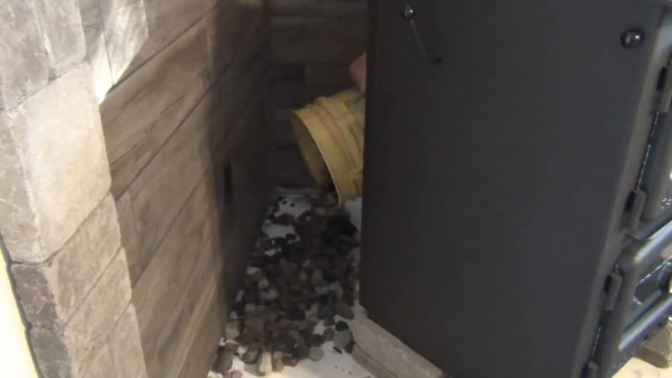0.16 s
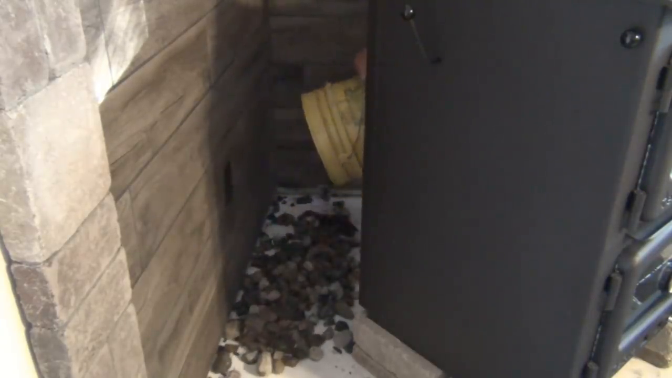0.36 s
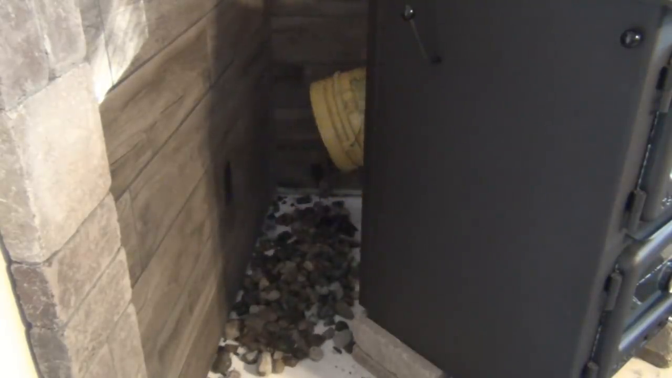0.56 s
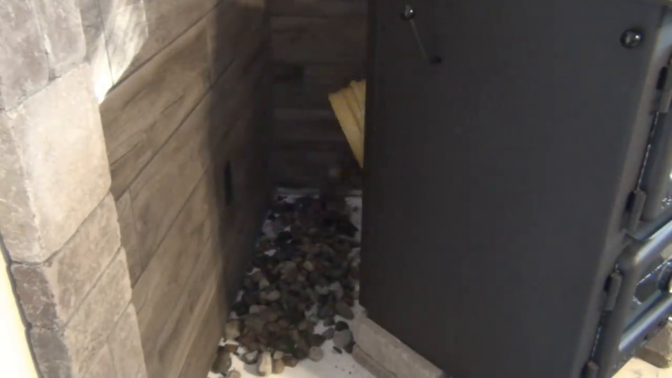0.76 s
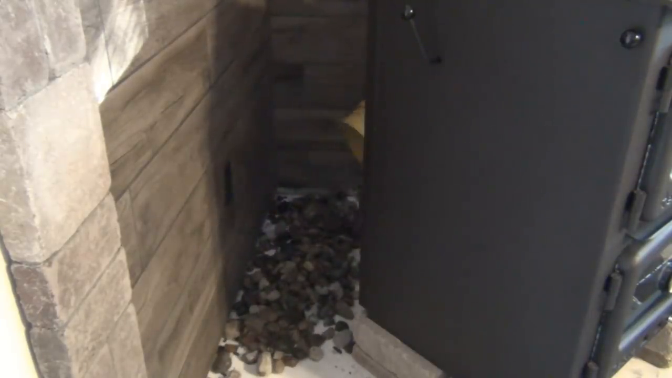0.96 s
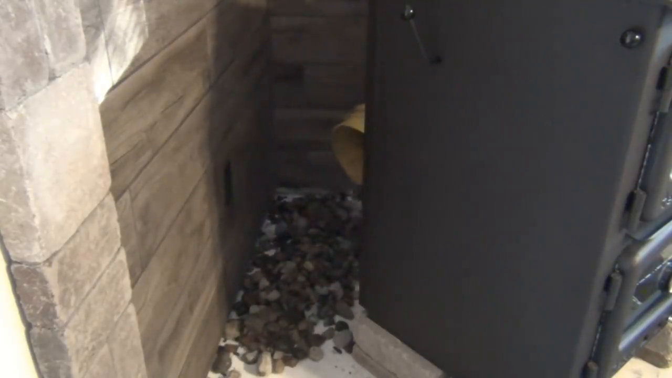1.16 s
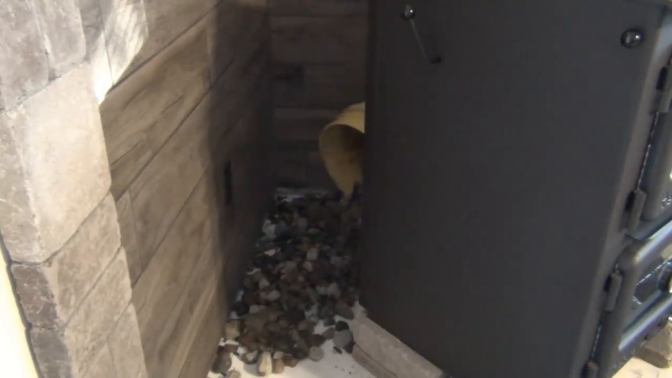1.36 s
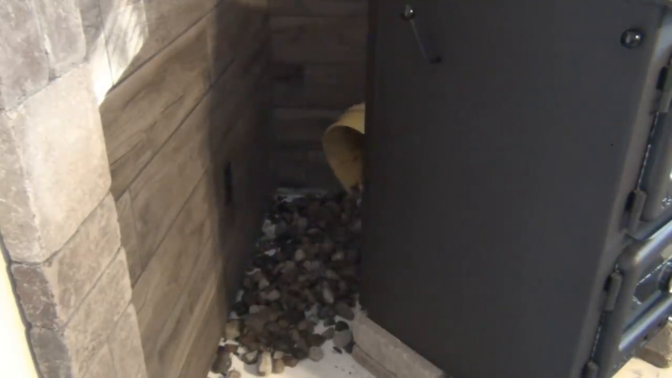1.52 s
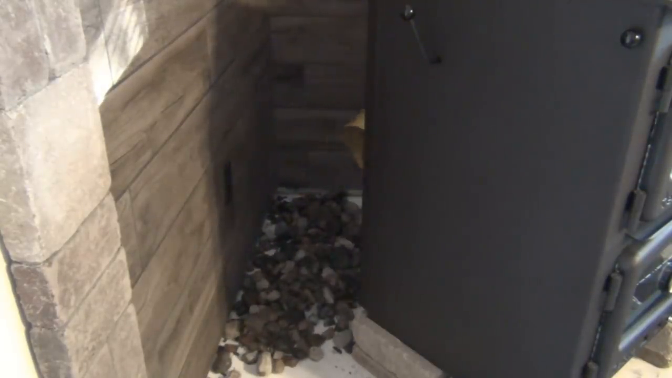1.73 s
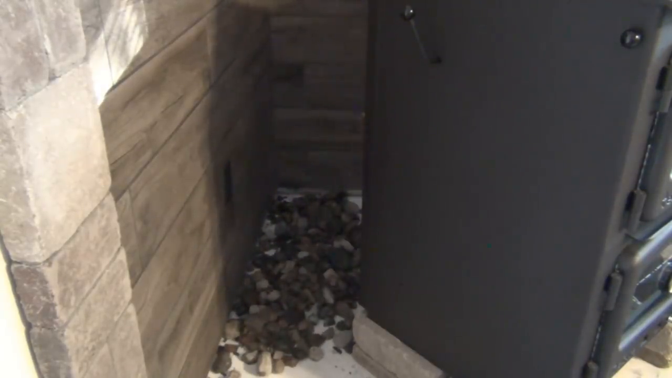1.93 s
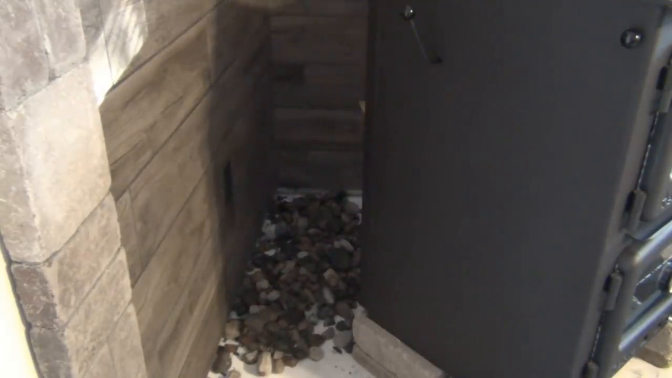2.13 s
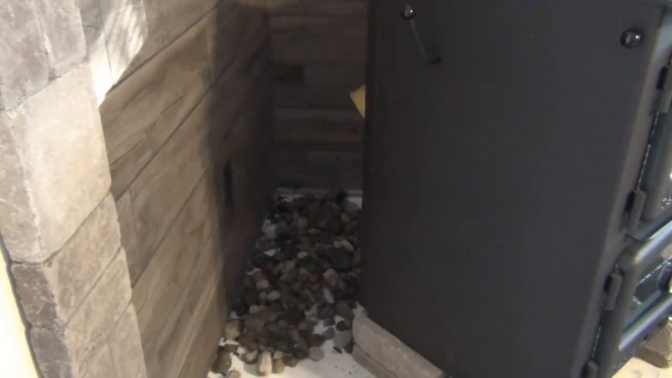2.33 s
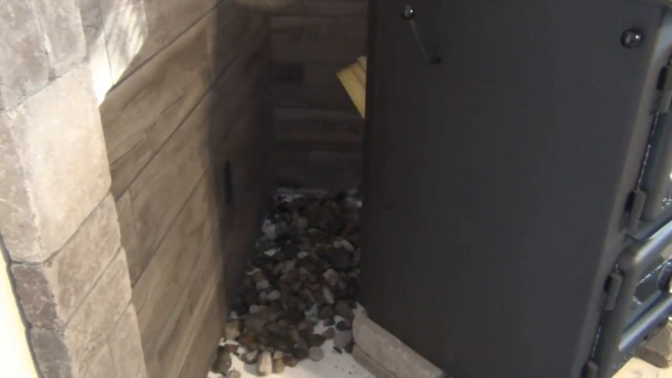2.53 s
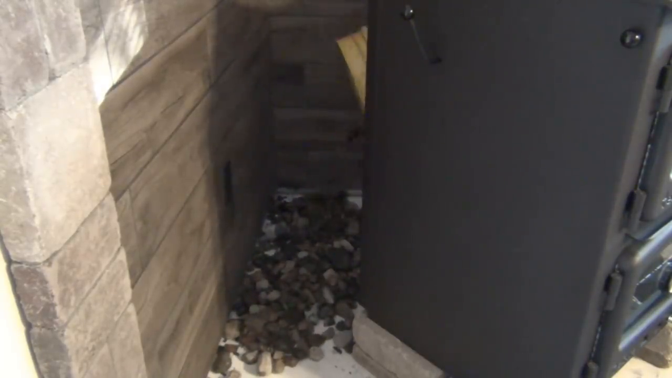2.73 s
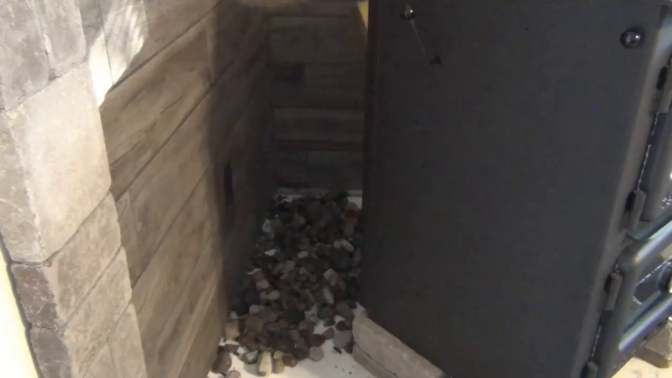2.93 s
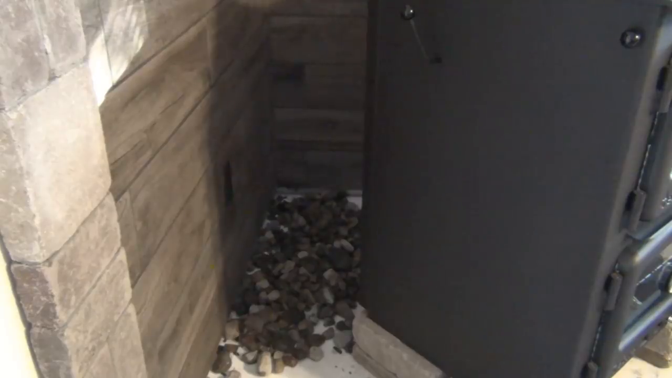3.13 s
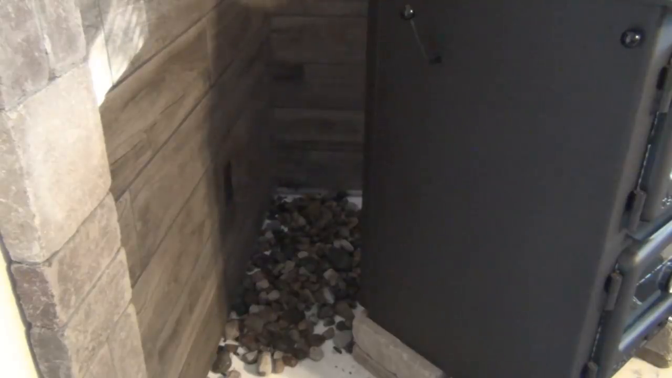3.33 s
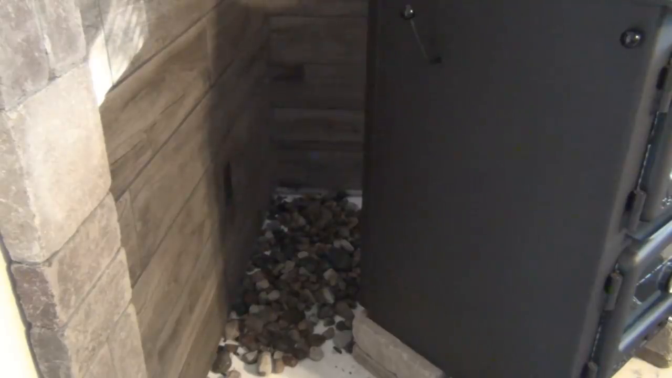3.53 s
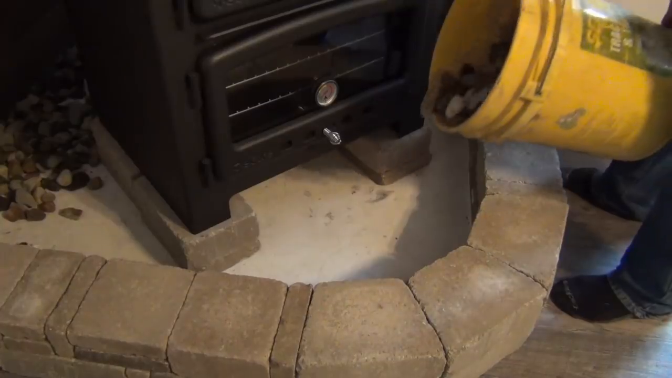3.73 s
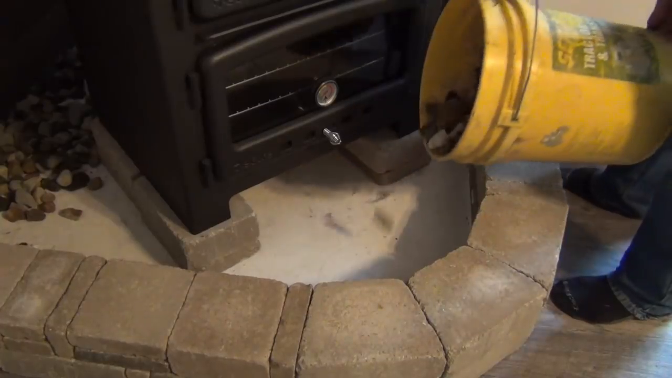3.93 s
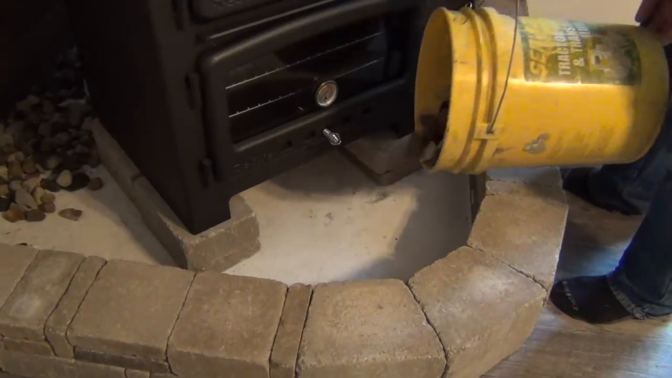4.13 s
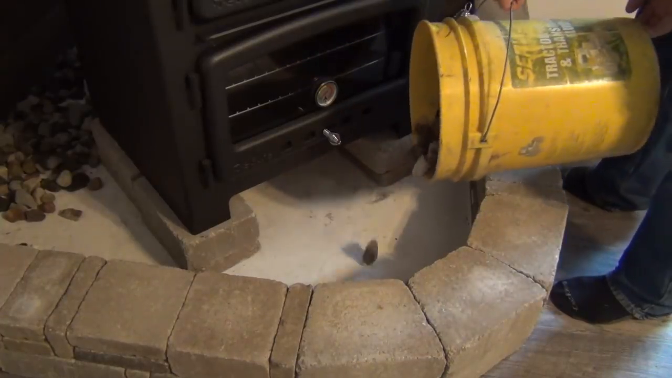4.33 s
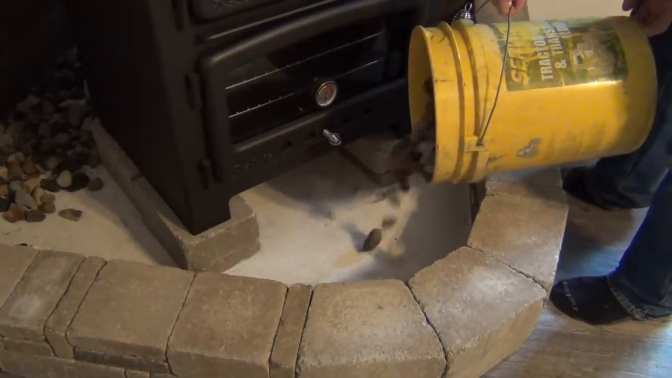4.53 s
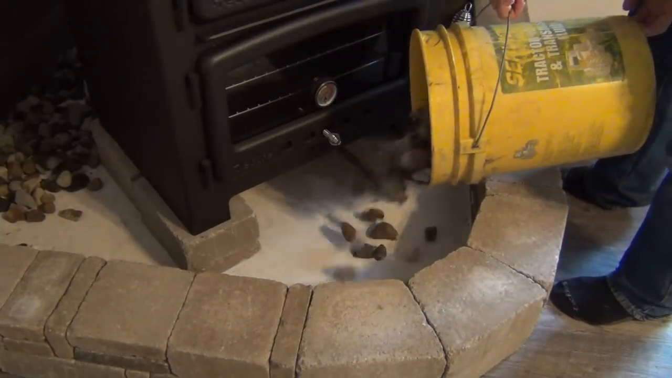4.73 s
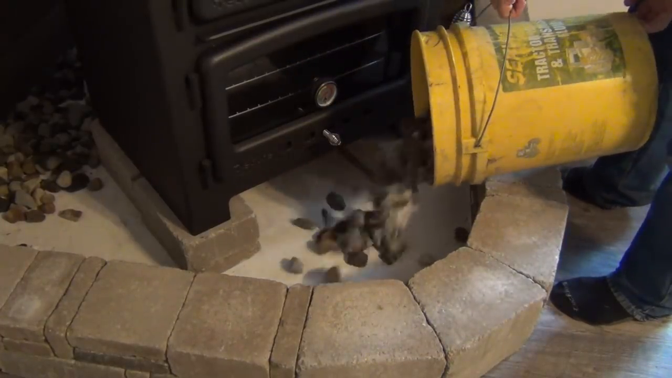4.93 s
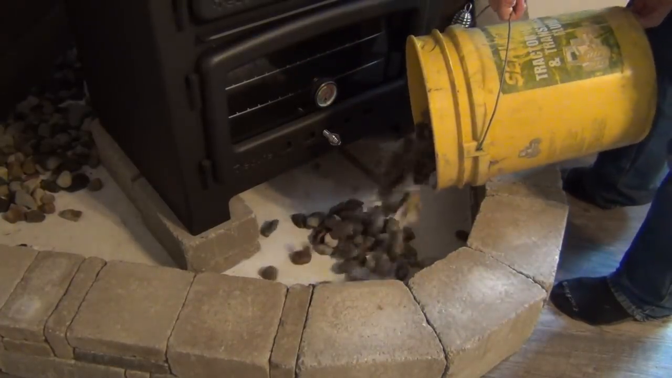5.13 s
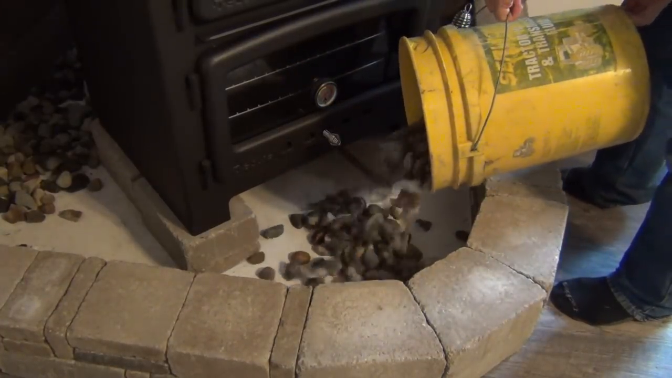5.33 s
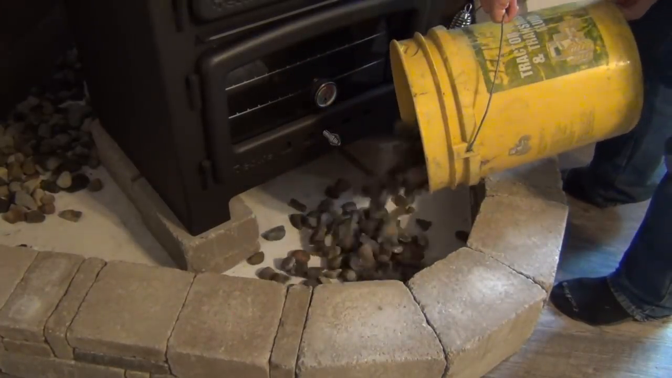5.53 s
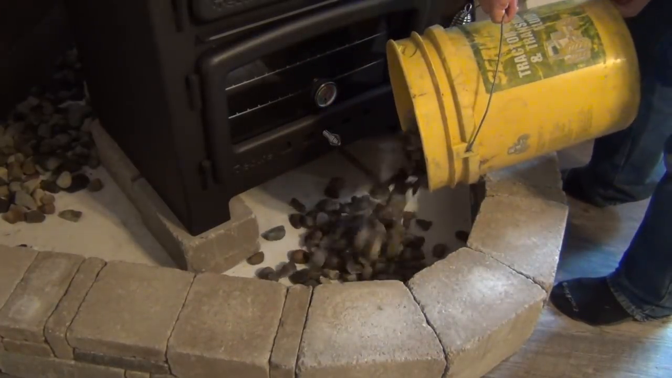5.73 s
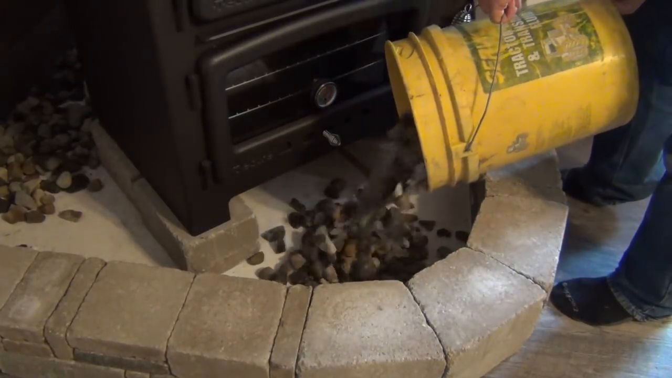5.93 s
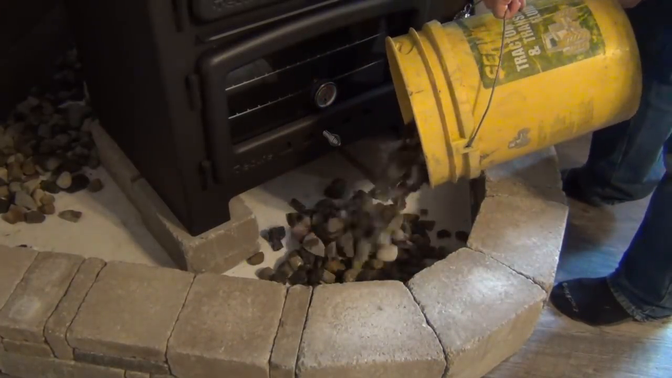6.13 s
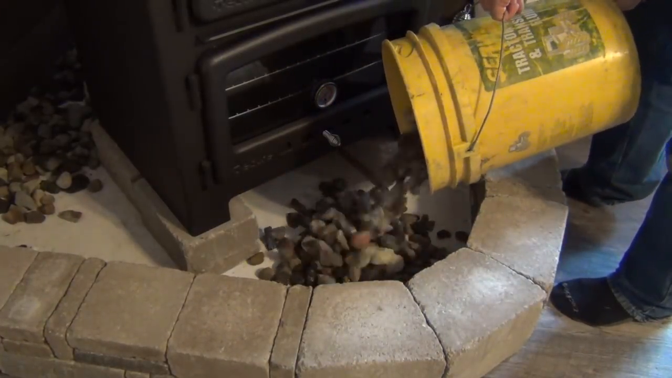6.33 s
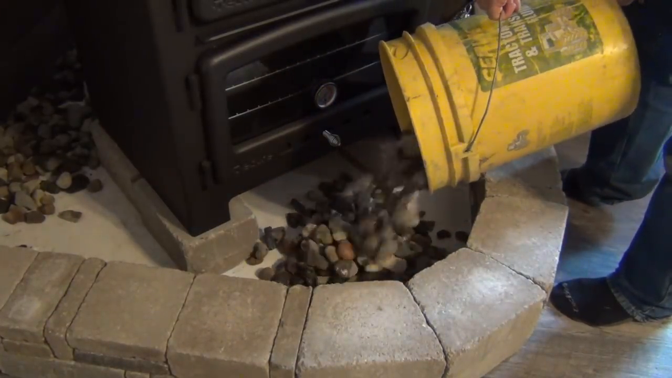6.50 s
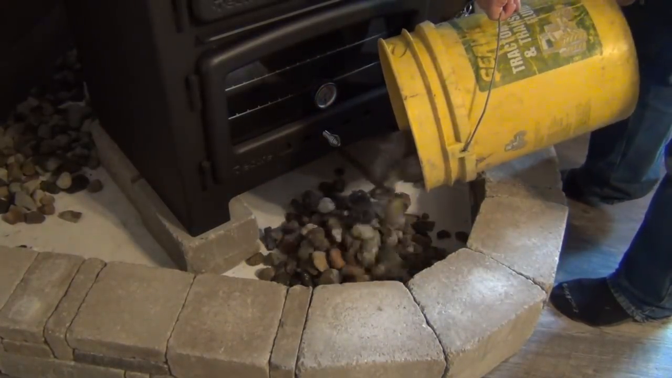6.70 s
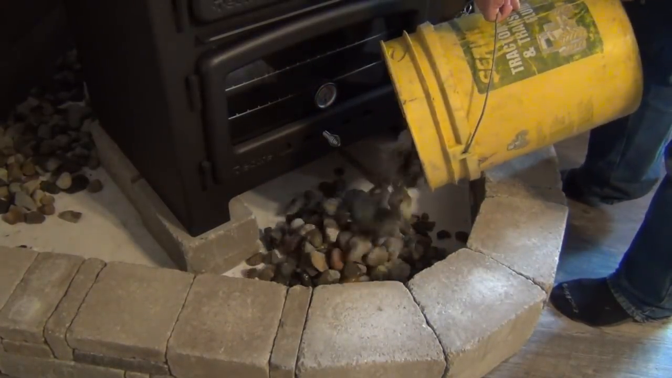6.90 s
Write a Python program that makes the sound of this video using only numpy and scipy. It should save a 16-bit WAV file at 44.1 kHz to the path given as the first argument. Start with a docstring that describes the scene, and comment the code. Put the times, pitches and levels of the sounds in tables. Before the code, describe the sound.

Pebbles tumble from a plastic bucket into a stone nook, knocking its hollow wall and clicking densely on the heap. The pour thins to a few bright ticks and a brief quiet with faint house hum. After an abrupt cut, scattered stones knock and land duller on bare hearth, then a thick rush follows until the end. Close, nearly mono microphone in a small hard room, loud peaks squashed.

```python
"""River pebbles pour from a plastic bucket into a stone nook, over a faint house hum that never stops.
Stones knock on the bucket wall and ring its hollow body; those that land click on the heap.
A hard-walled room echoes, some stones stand out with their own ring, and low thumps mark limiter pumping.
After a cut at 3.58 s a second pour goes onto a hearth, where stones landing on bare ground click duller.
All along, a limiter turns down the loud moments and rounds off the peaks."""
import sys
import numpy as np
from scipy import signal
from scipy.fft import rfft, irfft
from scipy.io import wavfile
from scipy.ndimage import uniform_filter1d

SR = 44100
rng = np.random.default_rng(int(sys.argv[2]) if len(sys.argv) > 2 else 0)


def unload_audio(sound):
    """Save the sound as a 16-bit wav file, at the path given as the first command line argument."""
    columns = np.transpose(np.atleast_2d(sound))
    # keep every value between -1 and 1, then stretch to whole-number steps
    steps = np.round(np.clip(columns, -1, 1) * 32767)
    wavfile.write(sys.argv[1], SR, steps.astype(np.int16))


N = 306936

# the two pours, one list each: (time [s], knocking in the bucket [relative dB], clicking on the heap [relative dB])
POURS = [
    [(0, -22.5, -18.5), (0.12, -27, -21), (0.47, -23, -25), (0.8, -23, -20), (1.28, -28.5, -20),
     (1.6, -25, -20.5), (1.95, -26.5, -20), (2.25, -29.5, -23), (2.6, -30.5, -23), (2.77, -40, -22),
     (2.785, -62, -22), (3.0, -54, -25), (3.19, -52, -50), (3.57, -59.5, -52.5)],
    [(3.58, -32, -48), (3.99, -33, -54), (4.23, -32.5, -37), (4.34, -26, -29.5), (4.42, -15, -24),
     (4.8, -20.5, -20), (5.04, -31, -19), (5.3, -27.5, -19), (5.55, -24.5, -20.5), (6.0, -24.5, -19.5),
     (6.25, -32, -21.5), (6.45, -19.5, -19.5), (6.78, -25, -21.5), (6.96, -20.5, -21.5)],
]
# batches of stones that slip at once:
# (start [s], length before the fade [s], knocking [relative dB], clicking [relative dB])
SLIPS = [(0.02, 0.026, -43, -35), (0.162, 0.024, -26.5, -38), (0.519, 0.021, -23, -32),
         (0.59, 0.025, -24, -39), (0.68, 0.039, -38, -28), (0.827, 0.034, -19.5, -35),
         (1.102, 0.16, -27, -36), (1.879, 0.017, -33, -29), (2.06, 0.067, -32, -33),
         (2.33, 0.12, -38.5, -33), (2.446, 0.021, -25.5, -31), (2.929, 0.008, -41.5, -32),
         (3, 0.021, -29.5, -36.5), (3.581, 0.13, -14, -22.5), (3.785, .04, -25, -30.5),
         (3.945, .025, -25, -46), (3.998, .02, -33, -25), (4.04, .03, -37.5, -40.5),
         (4.235, 0.013, -23.5, -29), (4.268, .02, -28, -41), (4.302, .02, -22.5, -24.5),
         (4.345, .03, -20.5, -33.5), (4.788, 0.026, -32, -32), (4.999, 0.023, -24, -31.5),
         (5.14, .04, -27, -33.5), (5.523, 0.034, -29, -26), (5.637, 0.033, -26.5, -33),
         (5.82, 0.12, -26, -27), (5.97, 0.01, -18, -31), (6.126, 0.024, -22, -29),
         (6.615, 0.049, -46.5, -31), (6.808, 0.037, -18.5, -28), (6.897, 0.042, -25.5, -23.5)]
# hollow ring of the bucket in each pose: (end of pose [s], list of (pitch [Hz], width [Hz], level [relative dB]))
BUCKET_POSES = [(0.48, [(345, 22, 0.5), (760, 21, -4.5), (931, 68, -10.5), (1490, 270, -4.5)]),
                (0.777, [(181.5, 10, 8), (344, 40, 1.5), (610, 31, -4), (862, 28, -0.5), (1590, 240, -3.5),
                (2710, 99, -19)]), (1.299, [(170, 22, -4), (351, 36, 0.5), (660, 26, -19), (769, 8.4, 6),
                (848, 25, 0), (2620, 290, -7.5)]), (2.781, [(211.4, 27, -1.5), (372, 13, -7.5),
                (429.6, 27, 6.5), (761, 33, 0), (925, 83, 4.5), (1310, 220, -0.5), (1560, 215, -1.5),
                (2100, 1130, -12)]), (3.578, [(149, 54, -1), (366, 40, 8.5), (593, 150, -3),
                (1780, 550, 0.5)]), (4.221, [(207, 61, -24), (492, 32, 3.5), (916, 19, -6), (1416, 13, -2),
                (1590, 120, -3)]), (5.001, [(211.5, 23, -2.5), (480, 54, -21.5), (568, 92, -0.5),
                (865, 61, -20), (1130, 85, 1), (1554, 170, -4)]), (6.96, [(321, 10, -5.5), (553, 110, -9),
                (896, 14, -1), (1202, 84, -3.5), (1490, 350, -6)])]
# broad knock of stone on plastic: (frequency [Hz], level [relative dB])
WALL_COLOUR = [(35, -76.5), (60, -35.5), (113, -22), (210, -11), (340, -13), (606, -2.5), (778, -2),
               (1190, 1.5), (6000, -6.5), (7800, -62.5), (13200, -120)]
# click of stone on stone: (frequency [Hz], level [relative dB])
HEAP_COLOUR = [(600, -43), (1500, -8), (2500, -6), (4000, -4), (5500, -1.5), (7000, -0.5), (9000, 1.5),
               (10500, -5)]
# stones landing on bare hearth: (time [s], share of the clicks [0 to 1])
BARE_SHARE = [(3.57, 0.088), (3.58, 0.9), (4.6, 0.97), (5.0, 0.18)]
# how bare hearth changes a click: (frequency [Hz], change [dB])
BARE_COLOUR = [(4000, 1.5), (6500, 1), (8000, -3), (10500, -10)]
# single stones that stand out: (time [s], peak before room and limiter [dB], main ring [Hz])
STONES = [(0.0344, -18, 5170), (0.227, -10, 4630), (0.296, -5, 2750), (0.355, -7, 3260),
          (0.3827, -10, 5750), (0.4703, 9, 6760), (0.525, -8, 2000), (0.545, 1, 1700), (0.5496, 4, 7200),
          (0.705, -13.5, 950), (0.86, -10, 895), (0.977, -4.5, 1660), (1.572, 1, 3380), (1.899, -7.5, 1300),
          (1.931, -8.5, 930), (1.989, -19, 947), (2.06, -11, 1500), (2.385, -8, 885), (2.4825, 8, 7600),
          (2.616, -13, 990), (2.7196, -7, 8550), (2.752, -9, 5800), (2.779, -3, 6440), (2.7885, -11, 9400),
          (2.804, -22, 2490), (2.8473, 0, 9550), (2.8591, 2, 9500), (2.8246, -8, 8400), (2.8777, -8, 7100),
          (2.905, -11, 8050), (2.936, -10, 2810), (2.9788, -2, 6200), (3.007, -20, 1950),
          (3.0159, -3, 2790), (3.105, -13, 4340), (3.2236, -23, 3980), (3.583, -7, 1240),
          (3.643, -10, 7600), (3.7592, 3, 6300), (3.9094, -17, 3020), (3.9488, -22, 3040),
          (3.968, -12, 2500), (3.9977, 4.5, 5700), (4.006, 4, 6300), (4.0157, -11, 4650), (4.042, -14, 990),
          (4.1688, -16, 4080), (4.2403, -12, 5040), (4.2426, -9.5, 3140), (4.268, -1, 1180),
          (4.334, 7, 6700), (4.345, -8, 1220), (4.3756, -3, 4800), (4.5662, 10.5, 6950), (4.656, -6.5, 562),
          (4.6978, -11, 6330), (4.829, -7, 3260), (4.913, -12, 1200), (5.015, -16, 1105), (5.0427, 4, 6650),
          (5.0496, -3, 6200), (5.15, -7, 1220), (5.528, -15, 1470), (5.575, -9, 1294), (5.645, -8, 1203),
          (5.6664, -12, 4800), (5.835, -6, 1920), (5.8905, -1, 3550), (5.975, -12.5, 1150), (6.16, 3, 9700),
          (6.258, -12, 1420), (6.325, -9, 1130), (6.613, -8, 1550), (6.656, 4, 7900), (6.804, 0, 6460),
          (6.875, -1, 4030), (6.909, -1, 1380)]
# low thumps as the limiter pumps on loud moments: (time [s], strength [relative dB])
THUMPS = [(.541, -31), (.616, -31), (1.319, -30), (1.521, -29), (3.996, -17.5), (4.553, -26), (4.724, -31),
          (4.8, -32), (4.915, -27), (5.041, -26), (5.651, -45), (5.956, -28), (6.057, -21), (6.246, -33),
          (6.486, -21), (6.851, -34)]
# colour of the house hum: (frequency [Hz], level [relative dB])
HUM_COLOUR = [(15, -88), (25, -33), (59, -24), (108, -31.5), (129, -13), (171, -2.5), (283, -14.5),
              (305, -18), (393, 0), (651, -13), (1320, -12), (8360, -27.5), (10500, -47), (13600, -65.5),
              (22000, -120)]
# fuzzy tones in the hum: (pitch [Hz], width [Hz], level before the limiter [dB])
HUM_TONES = [(70, 4, -63), (140, 5, -60), (275, 10, -60), (392, 5, -52), (432, 6, -55), (619, 12, -60)]
# how long the room echoes: (frequency [Hz], time to die by 60 dB [s])
ROOM_DECAY = [(150, 0.15), (1000, 0.41), (4000, 0.62), (10000, 0.31)]
# stretches between edits, which drop the echo of what came before: (edge [s])
CUTS = [0, 2.78, 3.58, 6.96]
# how far the two channels differ: (frequency [Hz], gain of the difference [dB])
WIDTH = [(30, -14.5), (90, -14.5), (200, -18.5), (650, -22.5), (850, -36), (4400, -91.5), (4800, -18),
         (10000, -15.5)]

HUM_DB = -43.5  # broad part of the hum, before the limiter
KNOCKS_PER_S, CLICKS_PER_S, BUMPS_PER_S = 1800, 3000, 59
SLIP_RISE_S, KNOCK_FADE_DB_PER_S, CLICK_FADE_DB_PER_S = 0.0021, 171, 133
RING_CYCLES, TICK_PER_KHZ = 49, 0.47  # a stone dies by 60 dB in so many cycles; high stones tick harder
TOP_HZ = 10150  # band limit of the recorder


def gain_of(db):
    """Turns decibels into a factor."""
    return 10 ** (np.asarray(db) / 20)


def evened(x):
    """Scales a sound to an average strength (rms) of 1."""
    return x / np.sqrt(np.mean(x ** 2) + 1e-20)


def read(points, hz):
    """Reads a curve between its points, on a log-frequency axis."""
    f, value = np.transpose(points)
    return np.interp(np.log(hz + 1), np.log(f + 1), value)


def coloured(x, points):
    """Filters with the given curve and no sound ahead of time: the phase follows from the log gain."""
    hz = abs(np.fft.fftfreq(4096, 1 / SR))
    log_gain = np.log(gain_of(np.maximum(read(points, hz), -100)))
    response = np.exp(np.conj(signal.hilbert(log_gain)))
    taps = np.fft.ifft(response).real[:2048]
    return signal.oaconvolve(x, taps)[:N]


def resonate(x, hz, width):
    """Rings at one pitch, with a gain of about 1 there; a narrower width rings longer."""
    r = np.exp(-np.pi * width / SR)
    return 2 * signal.lfilter([1 - r], [1, -r * np.exp(2j * np.pi * hz / SR)], x).real


def flow(column, fade_db_per_s):
    """Strength of one pour column: the steady pour plus slips that start fast, hold and die away."""
    rows = np.vstack(POURS)
    t = np.arange(0, N, 32) / SR
    power = gain_of(np.interp(t, rows[:, 0], rows[:, column])) ** 2
    for slip in SLIPS:
        since = t - slip[0]
        rise = np.clip(since / SLIP_RISE_S, 0, 1)
        fade_db = fade_db_per_s * np.maximum(since - slip[1], 0)
        power = power + (rise * gain_of(slip[column + 1] - fade_db)) ** 2
    return np.interp(np.arange(N) / SR, t, np.sqrt(power))


def knocking():
    """How strongly stones knock in the bucket at each moment."""
    return flow(1, KNOCK_FADE_DB_PER_S)


def blows(per_s, spread_db, clump=0.):
    """Random impacts, a few large; a landing stone jolts its neighbours, so they come in dying clumps."""
    size = gain_of(spread_db * np.minimum(rng.exponential(1, N), 4))
    size = size * rng.choice([-1., 1.], N)
    jolt_starts = rng.random(N) < 60 / SR  # about 60 a second, each dying over 8 ms
    jolts = signal.lfilter([1], [1, -np.exp(-1 / (.008 * SR))], jolt_starts)
    busy = 1 + clump * jolts
    struck = rng.random(N) < per_s / SR * busy / busy.mean()
    return evened(size * struck)


def pebble(hz, t60, tick, count):
    """A sharp tick and a few unrelated tones that die by 60 dB in t60 seconds."""
    t = np.arange(1200) / SR
    ratios = [1, *rng.uniform(0.54, 1.834, count)]
    ring = sum(np.sin(2 * np.pi * hz * k * t) * rng.uniform(0.66, 1) for k in ratios)
    ring = ring * gain_of(-60 * t / t60)
    ring[1:6] += tick * np.array([0.34, -0.43, -0.31, 0.18, -0.94])  # the stone is pushed, then stops
    return ring


def clatter(hits, low_hz, high_hz, t60, tick, count):
    """Each hit rings one of many differently pitched bodies."""
    kind, out = rng.integers(0, count, N), np.zeros(N + 1200)
    for k, hz in enumerate(np.geomspace(low_hz, high_hz, count)):
        ring = pebble(hz, t60, tick, count=2)[:round(t60 * SR)]
        at = np.flatnonzero(hits * (kind == k))
        copies = hits[at, None] * ring / np.linalg.norm(ring)
        places = at[:, None] + np.arange(len(ring))
        out += np.bincount(places.ravel(), copies.ravel(), N + 1200)
    return out[:N]


def house_hum():
    """Broad hiss, strongest in the lows, with a few fuzzy low tones made by ringing noise."""
    hiss = gain_of(HUM_DB) * evened(coloured(rng.standard_normal(N), HUM_COLOUR))
    noise = rng.standard_normal(N)
    tones = sum(gain_of(db) * evened(resonate(noise, hz, width)) for hz, width, db in HUM_TONES)
    return hiss + tones


def bucket():
    """Pitched knocks on patches of the wall, plus the hollow ring of the pose the bucket is held in."""
    knocks = knocking() * blows(KNOCKS_PER_S, spread_db=3.5, clump=2.2)
    hollow, start = np.zeros(N), 0
    for end_s, modes in BUCKET_POSES:
        end = min(round(end_s * SR), N)
        drive = np.append(knocks[start:end], np.zeros(SR // 5))[:N - start]  # time to ring on
        ring = sum(gain_of(db + 11.0) * resonate(drive, hz, width) for hz, width, db in modes)
        hollow[start:start + len(drive)] += ring
        start = end
    wall = coloured(clatter(knocks, 178.4, 3594, 0.013, tick=3.7, count=60), WALL_COLOUR)
    out = hollow + gain_of(-2) * wall
    return gain_of(2.0) * out * np.std(knocks) / np.std(out)


def low_rumble():
    """Low random bumps that follow the knocking in the bucket."""
    bumps = blows(BUMPS_PER_S, spread_db=5.0)
    rumble = coloured(bumps, [(15, -19), (30, 27), (60, -10), (110, 17), (250, -8)])  # (Hz, dB)
    return knocking() * gain_of(-32) * evened(rumble)


def heap():
    """Dense clicks, each from one of many pebbles; a share of them lands duller on bare hearth."""
    hits = flow(2, CLICK_FADE_DB_PER_S) * blows(CLICKS_PER_S, spread_db=2.5, clump=1.7)
    clicks = coloured(clatter(hits, 2520, 9750, 0.0078, tick=1.13, count=90), HEAP_COLOUR)
    bare = np.clip(np.interp(np.arange(N) / SR, *np.transpose(BARE_SHARE)), 0, 1)
    out = (1 - bare) * clicks + bare * coloured(clicks, BARE_COLOUR)
    return gain_of(-0.5) * out * np.std(hits) / np.std(out)


def tail(delay):
    """One echo pattern: sparse taps of random sign, each band dying at its own speed."""
    taps = np.zeros(SR // 2)
    at = np.arange(delay, SR // 2 - 20, 20)
    taps[at + rng.integers(0, 20, len(at))] = rng.choice([-1., 1.], len(at))
    hz, t, bands = signal.stft(taps, SR, nperseg=256)
    fade = gain_of(-60 * t / read(ROOM_DECAY, hz)[:, None])
    decayed = signal.istft(bands * fade, SR, nperseg=256)[1]
    return decayed / np.linalg.norm(decayed)


def room(x, delay, count=8):
    """Stones land at ever other spots, so every 3 ms a randomly picked echo pattern answers."""
    spot = np.repeat(rng.integers(0, count, N // 128 + 1), 128)[:N]
    tails, out = [tail(delay) for k in range(count)], np.zeros(N)
    for start_s, end_s in zip(CUTS, CUTS[1:]):
        a, b = round(start_s * SR), round(end_s * SR)
        out[a:b] = sum(signal.oaconvolve((x * (spot == k))[a:b], tails[k])[:b - a] for k in range(count))
    return out


def single_stones():
    """One ring for each stone that stands out; higher stones die sooner."""
    out = np.zeros(N + 1200)
    for s, db, hz in STONES:
        ring = pebble(hz, RING_CYCLES / hz, TICK_PER_KHZ * hz / 1000, count=2)
        out[round(s * SR):][:1200] += gain_of(db) * ring / abs(ring).max()
    return out[:N]


def limiter_thumps():
    """Low thumps as the limiter pumps on loud moments: a quick dip that swings back and settles."""
    out = np.zeros(N + 4000)
    u = np.arange(4000) / SR / 0.0045  # time in steps of 4.5 ms
    for s, db in THUMPS:
        out[round(s * SR):][:4000] -= gain_of(db) * u * (2 - u) * np.exp(-u)
    return out[:N]


def scene():
    """Nearly mono: the channels differ in the bass and treble; stereo coding leaves the middle band alike."""
    stones = bucket() + heap() + single_stones()
    low = limiter_thumps() + low_rumble() + house_hum()
    mid = stones + gain_of(-8.0) * room(stones, 120) + low  # first echo after about 3 ms
    side_hiss = gain_of(-40.5) * rng.standard_normal(N)
    apart = room(stones, 30) + 1.1 * room(low, 30, count=1) + side_hiss
    apart = apart + 0.18 * mid  # leans a little left
    side = irfft(rfft(apart) * gain_of(read(WIDTH, np.fft.rfftfreq(N, 1 / SR))), N)
    return np.array([mid + side, mid - side])


def record(dry):
    """A quick limiter dips the level after each loud stone; peaks are rounded off, then the band limit."""
    level_db = 10 * np.log10(abs(uniform_filter1d((dry ** 2).mean(0), 44)) + 1e-12)  # over 1 ms
    fall = np.arange(N) * 940.0 / SR  # recovery, dB a second
    held_db = np.maximum.accumulate(level_db + fall) - fall
    over_db = np.maximum(held_db + 19.5, 0)  # how far above -19.5 dB
    limited = dry / gain_of(0.39 * uniform_filter1d(over_db, 30))
    rounded = 0.52 * np.tanh(limited / 0.61)
    low_pass = signal.firwin(401, TOP_HZ, window=("kaiser", 9), fs=SR)
    return signal.oaconvolve(rounded, low_pass[None], "same")


dry = scene()
out = record(dry)
unload_audio(out)
```